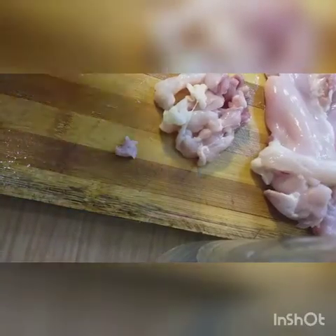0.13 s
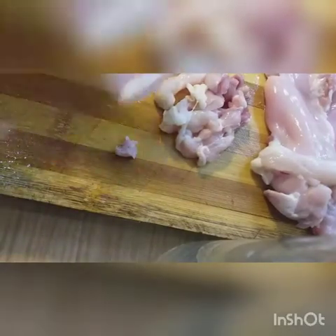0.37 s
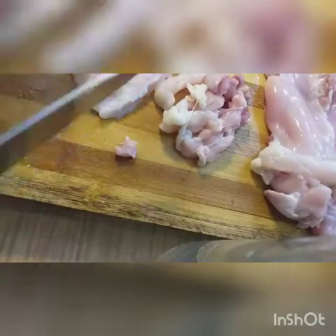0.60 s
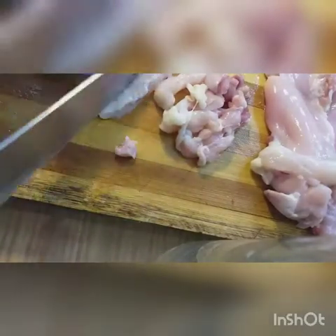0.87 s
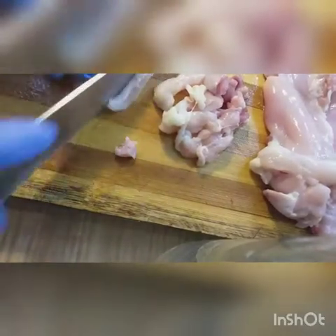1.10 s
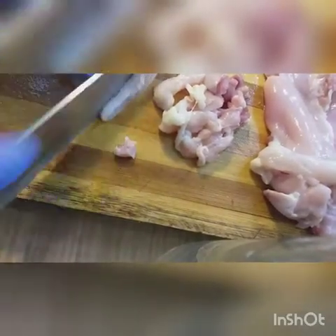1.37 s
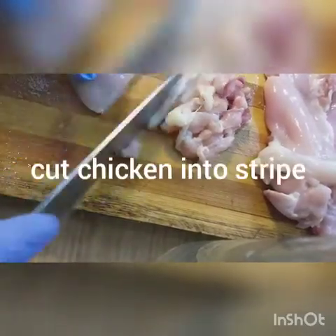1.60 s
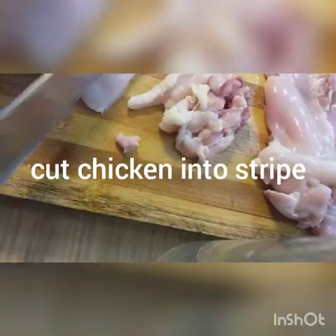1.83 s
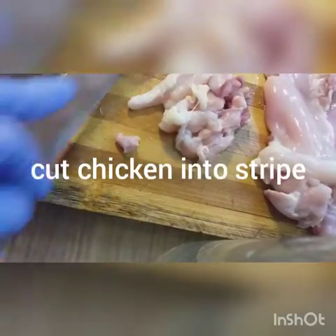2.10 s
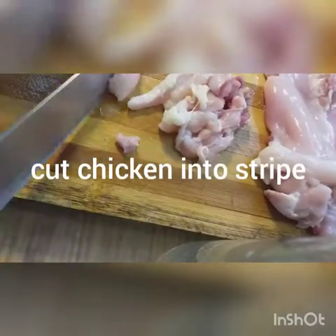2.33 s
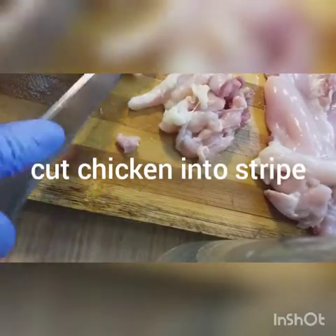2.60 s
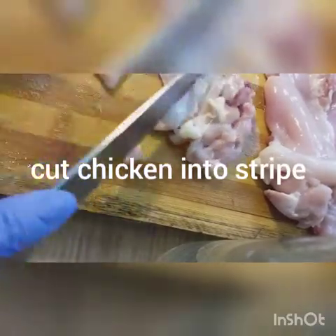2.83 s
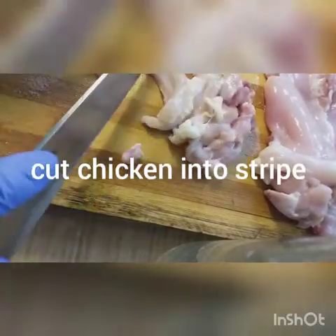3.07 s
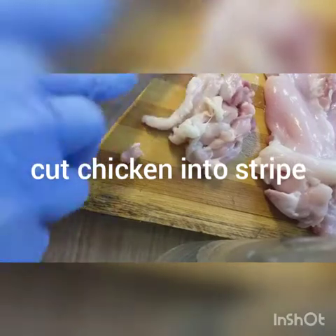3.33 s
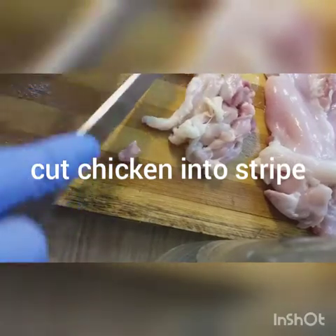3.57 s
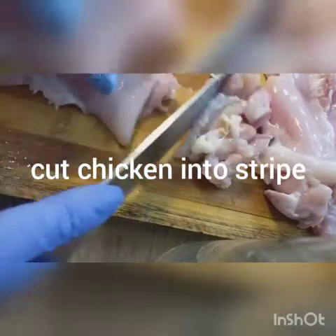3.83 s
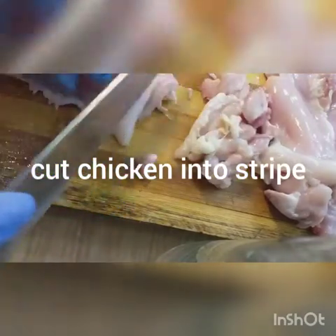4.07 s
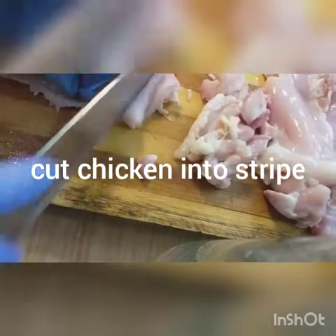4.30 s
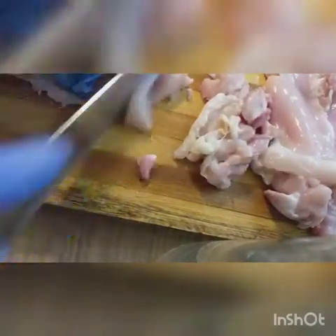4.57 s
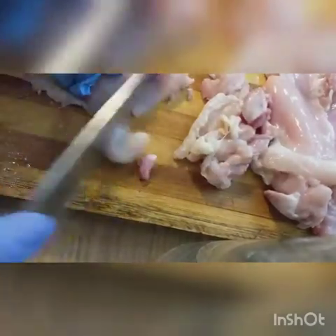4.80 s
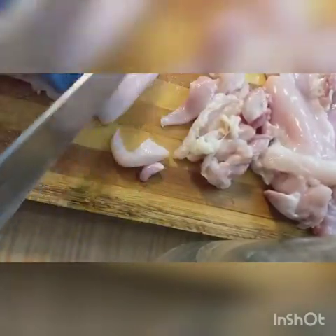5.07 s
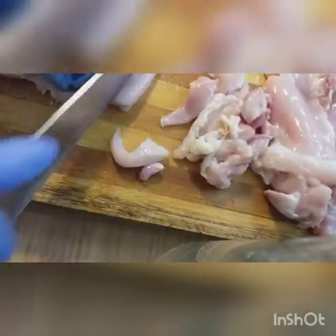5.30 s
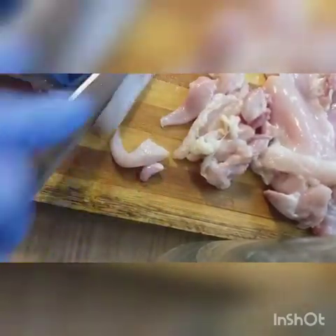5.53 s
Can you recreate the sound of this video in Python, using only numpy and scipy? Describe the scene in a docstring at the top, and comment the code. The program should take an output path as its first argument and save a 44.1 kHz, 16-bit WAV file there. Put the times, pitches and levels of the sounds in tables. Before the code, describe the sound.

A knife cuts raw meat on a wooden board, very close, in a small, fairly dry kitchen. A clear tap with a faint scrape comes at 0.4 s, then near quiet. From 1.05 to 1.65 s three rasping strokes swell, the last two strong. At 2.0 s the board thuds low amid quick knocks, and scrapes run to 2.6 s, the loudest around 2.3; a weaker stroke follows at 2.8. Short scrapes with taps come at 3.2, 3.45 and 3.55 s, then a sharp bladelike click at 3.8. From 4.3 s heavy thuds and knocks lead into a long scrape near 4.6 and a crisp stroke at 4.8. Another thud at 5.27 s begins two last strokes, the stronger near 5.6. Scrapes are gritty, bright steel on wood with airy hiss; small wet ticks and shuffling fill gaps over faint fridge hum, thin whine and hiss.

```python
"""A knife saws strips of raw meat on a wooden board, close to a phone's microphone in a small kitchen.
Strokes, blows, drags and landings drive noise through the resonances of edge, board, blade and counter.
Wet meat ticks in short filtered snaps as it parts; decaying sines thud as the board rocks on the counter.
Behind them lie a fridge's hum and whine, made of resonant noise, the air of the kitchen and a faint hiss."""
import sys
import numpy as np
from scipy import signal
from scipy.fft import rfft, irfft, next_fast_len
from scipy.io import wavfile
from scipy.ndimage import map_coordinates

SR = 44100
rng = np.random.default_rng(int(sys.argv[2]) if len(sys.argv) > 2 else 0)


def materialize(psi):
    """Save the field psi as 16-bit PCM at rate SR to the path in sys.argv[1].

    A 1-D psi becomes a single channel; in a 2-D psi each row is a channel.
    """
    bounded = np.clip(np.atleast_2d(psi).T, -1, 1)
    quanta = np.round(bounded * 32767).astype(np.int16)
    wavfile.write(sys.argv[1], SR, quanta)


def gain_from_db(level_db):
    """Turn a decibel level (scalar or array-like) into a linear amplitude factor."""
    decades = np.asarray(level_db, float) / 20
    return 10 ** decades


N = 250047  # samples

# share of the scrape, of the blade or of the board's low modes [dB]
DULL_DB, KEEN_DB, RING_DB, COUNTER_DB = -4, -5.5, -11.5, -12.5


def unit(x):
    """Scale to rms 1."""
    return x / np.sqrt(np.mean(x ** 2) + 1e-20)


def unit_gain(h):
    """Scale a response so that white noise keeps its power."""
    return h / np.sqrt(np.mean(np.abs(h) ** 2))


def along(points, hz):
    """Interpolate (frequency [Hz], value) points on a log frequency axis."""
    f, v = np.transpose(points)
    return np.interp(np.log(hz + 1), np.log(f + 1), v)


def wobble(rate):
    """A smooth random curve, rate knots a second."""
    knots = rng.standard_normal(int(N * rate / SR) + 4)
    return map_coordinates(knots, [np.arange(N) * rate / SR])


def filtered(x, response):
    """x times a complex response of frequency."""
    m = next_fast_len(N + SR // 2)
    return irfft(rfft(x, m) * response(np.fft.rfftfreq(m, 1 / SR)), m)[:N]


def modes(table):
    """Causal response of resonances with alternating signs, of unit noise gain."""
    def response(f):
        total = 0
        for k, (centre, width, db) in enumerate(table):
            resonance = 1j * f * width / (centre * centre - f * f + 1j * f * width)
            total = total + (-1) ** k * gain_from_db(db) * resonance
        return unit_gain(total)
    return response


def colour(spectrum):
    """Smooth response of unit noise gain."""
    return lambda hz: unit_gain(gain_from_db(along(spectrum, hz)))


def shifting(drive, table):
    """As the contact slides along blade and board, each mode is excited a little more or less."""
    power = np.array([width * gain_from_db(db) ** 2 for _, width, db in table])
    share = np.sqrt(power / power.sum())
    out = np.zeros(N)
    for k, mode in enumerate(table):
        gain = gain_from_db(2.5 * wobble(22))
        out += (-1) ** k * share[k] * filtered(gain * drive, modes([mode]))
    return out


def burst(level_db, t60):
    """A sharp first contact, then a short tail of contact noise."""
    t = np.arange(SR // 8) / SR
    tail = gain_from_db(-60 * t / t60) * (1 - np.exp(-t / 0.00054))
    click = 1.43 * gain_from_db(-60 * t / 0.0037)
    hit = (tail + click) * rng.standard_normal(len(t))
    hit[0] = 3.05
    return gain_from_db(level_db) * hit


def knife():
    """Every contact drives the same bodies: edge, board low and high, blade faces, free blade, counter."""
    # rows: scrape, board, blade faces, upper board, cutting edge, free ring, counter
    drive = np.zeros((7, N + SR))
    drive[:, :N] = sawing()
    add_blows(drive)
    add_swipes(drive)
    add_landings(drive)
    scrape, board, faces, dull, keen, free, shake = drive[:, :N]
    return edge_on_wood(scrape, keen) + board_ring(board, dull) + blade_ring(free, faces), shake


def sawing():
    """Friction noise on each body, under the pressure of the strokes and the shuffling between them."""
    scrape, board, blade = strokes()
    shares = [scrape, board, blade, gain_from_db(DULL_DB) * scrape, gain_from_db(KEEN_DB) * scrape,
              gain_from_db(RING_DB) * blade, gain_from_db(COUNTER_DB) * board]
    shuffle = gain_from_db(shuffle_level() + 0.77 * wobble(15))
    grain = friction(catch_db=1.43, judder_db=0.78)
    drives = []
    for share, db in zip(shares, SHUFFLE_SHARES):
        pressure = np.hypot(share, gain_from_db(db) * shuffle)
        drives.append(grain * gain_from_db(0.95 * wobble(15)) * pressure * rng.standard_normal(N))
    return np.array(drives)


# strokes of the blade: (start [s], fastest [s], end [s], scrape level [dB],
# easing off after the fastest [dB], board share [dB], blade share [dB])
BLADE_STROKES = [(0.376, 0.393, 0.55, -46.5, 14, -4, -5.5), (1.05, 1.15, 1.233, -38.5, 8.5, -0.5, -1.5),
                 (1.244, 1.407, 1.484, -32, 25.5, -4.5, -3.5),
                 (1.483, 1.557, 1.663, -31.5, 35.5, -1.5, -7.5), (2.023, 2.033, 2.2, -48, 4, 2, 0.5),
                 (2.105, 2.117, 2.176, -35.5, 25, -4.5, -5.5), (2.191, 2.313, 2.408, -31, 26, -8, -4.5),
                 (2.408, 2.511, 2.577, -37, 20, -3, -4.5), (2.598, 2.626, 2.73, -54.5, 8.5, -1.5, -1.5),
                 (2.756, 2.845, 2.965, -42.5, 12.5, -14, -2), (3.223, 3.249, 3.37, -34, 12, -4, -3.5),
                 (3.44, 3.452, 3.54, -34, 11, -3, -3), (3.537, 3.554, 3.617, -35.5, 35, -2.5, -3),
                 (3.766, 3.831, 3.89, -42, 10, -8, -0.5), (4.268, 4.33, 4.365, -43.5, 1, 0.5, -1.5),
                 (4.349, 4.355, 4.447, -33.5, 7.5, -6, -4.5), (4.458, 4.585, 4.68, -31, 16.5, -7, -4),
                 (4.699, 4.752, 4.8, -38.5, -9, -4.5, -8), (4.758, 4.779, 4.87, -33.5, 34.5, -6, -3.5),
                 (5.245, 5.316, 5.44, -35.5, 7, -5.5, -5), (5.451, 5.589, 5.674, -30.5, 10, -6.5, -7.5)]
BITE_DB = 4  # the board is pressed this much harder at the start of a stroke than at its end
RISE_POWER, FACE_POWER, STOP_S = 1.28, 0.95, 0.035  # quarter-sine power; faces' power; final halt
# turning back within TURN_S, the edge takes hold with this share of its pressure, in GRIP_S
GRIP, GRIP_S, TURN_S = 0.14, 0.005, 0.03


def strokes():
    """Pressure of every stroke on scrape, board and blade: it swells, eases off and halts."""
    t, out, last_end = np.arange(N) / SR, np.zeros((3, N)), 0
    for start, fastest, end, db, ease_db, board_db, blade_db in BLADE_STROKES:
        rise = np.clip((t - start) / (fastest - start), 0, 1)
        late = np.clip((t - fastest) / (end - fastest), 0, 1)
        grip = GRIP * (start - last_end < TURN_S)
        swell = grip * np.clip((t - start) / GRIP_S, 0, 1)
        swell += (1 - grip) * np.sin(np.pi / 2 * rise) ** RISE_POWER
        halt = np.sqrt(np.clip((end - t) / STOP_S, 0, 1))
        speed = swell * gain_from_db(-ease_db * late) * halt
        bite_db = BITE_DB * (.5 - np.clip((t - start) / (end - start), 0, 1))
        on_board = gain_from_db(board_db + bite_db) * speed
        on_blade = gain_from_db(blade_db) * speed ** FACE_POWER
        out += (gain_from_db(db) * np.array([speed, on_board, on_blade])) ** 2
        last_end = end
    return np.sqrt(out)


# how the shuffling reaches the seven bodies, in the order of the knife's rows: share [dB]
SHUFFLE_SHARES = [-1, -11, -5, -11.5, -6.5, -16.5, -5]
# glove, blade and meat shuffle between the strokes: (time [s], level [dB])
SHUFFLE_LEVELS = [(0, -59.5), (0.13, -72), (0.205, -76), (0.22, -64.5), (0.29, -74), (0.34, -66),
                  (0.54, -66), (0.62, -77), (0.85, -82), (1.02, -67.5), (1.05, -62), (1.66, -58),
                  (1.78, -72.5), (1.85, -66.5), (1.92, -74.5), (2.0, -59), (3.0, -59.5), (3.15, -68.5),
                  (3.21, -54.5), (3.41, -54), (3.62, -62), (3.76, -59.5), (3.9, -57), (3.96, -63.5),
                  (4.1, -70), (4.27, -62), (4.88, -58.5), (5.04, -70), (5.17, -68.5), (5.24, -59),
                  (5.67, -56)]


def shuffle_level():
    """Level of the shuffling at every sample, in dB."""
    time, level = np.transpose(SHUFFLE_LEVELS)
    return np.interp(np.arange(N) / SR, time, level)


def friction(catch_db, judder_db):
    """The edge catches on wood fibres: uneven grains, sudden snags, slower judder, felt by every body."""
    snags = (rng.random(N) < 90 / SR) * .9 * rng.random(N)  # about 90 a second
    snags = signal.fftconvolve(snags, np.exp(-np.arange(800) / SR / 0.0032))[:N]
    roughness_db = catch_db * wobble(700) + judder_db * wobble(35) + 1.18 * wobble(90)
    return unit(gain_from_db(roughness_db) * (1 + snags))


# blade meets board: (time [s], contact level [dB], knock share [dB], blade share [dB], t60 [s])
BOARD_BLOWS = [(0.3825, -22.5, -2.5, -10.5, 0.031), (1.2457, -48, 1, -6, .035),
               (2.0328, -45, 13, -12, 0.023), (2.0727, -40, 2.5, -5, 0.018), (2.0896, -41, -4, -12, 0.027),
               (2.112, -33, -6, -6, .044), (2.2004, -37.5, -1, -12, 0.045), (2.7566, -50, 6, -8, .035),
               (2.7744, -48, 9, -9, .028), (3.2293, -34, -9, -12.5, 0.031),
               (3.4456, -33.5, -13, -15, 0.037), (3.5458, -30.5, -3.5, -9, .047),
               (3.5699, -34.5, -3, -10, 0.021), (3.7815, -26, -0.5, 6, .022),
               (4.3071, -41, 9, -14.5, 0.039), (4.3548, -29, -10, -17, 0.041),
               (4.3894, -41.5, 13.5, -13, 0.027), (4.4648, -39.5, -1, -8, .035),
               (4.7035, -45.5, 1, -12, 0.058), (4.7775, -26.5, 1.5, -16, 0.041),
               (5.2563, -47, -11, 7, 0.027), (5.2614, -47, 15, -9, .029), (5.4538, -41, 2, -20, 0.035)]


def add_blows(drive):
    """One burst of contact noise strikes all the bodies, each by its share."""
    for s, db, knock_db, ring_db, t60 in BOARD_BLOWS:
        hit = burst(db, t60)
        shares_db = [[0], [knock_db], [ring_db], [-6], [-8.5], [ring_db + RING_DB], [knock_db - 10.5]]
        drive[:, round(s * SR):][:, :len(hit)] += gain_from_db(shares_db) * hit


# the blade is dragged sideways: (start [s], length [s], ring level [dB], board level [dB])
SIDEWAYS_DRAGS = [(1.514, 0.063, -29, -28), (3.544, 0.04, -35, -36), (4.764, 0.038, -30.5, -30.5)]


def add_swipes(drive):
    """Noise that swells and fades lets the blade ring freely and drums the board."""
    for s, length, ring_db, drum_db in SIDEWAYS_DRAGS:
        drag = np.hanning(round(length * SR))
        drag = drag * rng.standard_normal(len(drag))
        drive[5, round(s * SR):][:len(drag)] += gain_from_db(ring_db) * drag
        drive[1, round(s * SR):][:len(drag)] += gain_from_db(drum_db) * drag


# the blade lands flat as it begins to slide: (start [s], length [s], board level [dB])
FLAT_LANDINGS = [(2.025, 0.043, -36), (2.76, 0.083, -42.5), (3.231, 0.045, -38), (4.293, 0.075, -38.5),
                 (5.259, 0.044, -34.5)]


def add_landings(drive):
    """A quick press of noise drums the board and shakes the counter."""
    for s, length, drum_db in FLAT_LANDINGS:
        press = np.sin(np.pi * np.linspace(0, 1, round(length * SR)) ** .5)
        press = press * rng.standard_normal(len(press))
        start = round(s * SR)
        drive[[1, 6], start:start + len(press)] += gain_from_db([[drum_db], [drum_db + COUNTER_DB]]) * press


# steel on wood: (centre [Hz], width [Hz], relative level [dB])
EDGE_MODES = [(2915, 66, -7.5), (3526, 80, 3), (3996, 78, 7.5), (4084, 162, 14), (4670, 170, -10.5),
              (4850, 130, -2), (5233, 360, -10), (5600, 120, 2)]
# broad rasp of the scrape: (frequency [Hz], relative density [dB per Hz])
RASP_SPECTRUM = [(2000, -23.5), (2900, -2.5), (4300, 1.5), (5700, 0.5), (6500, -27.5), (8500, -27.5)]
# the thin cutting edge: (centre [Hz], width [Hz], relative level [dB])
KEEN_MODES = [(6120, 102, -1), (6690, 164, -3.5), (6960, 210, -7), (7260, 260, -3), (7750, 260, -4),
              (8225, 360, -6)]


def edge_on_wood(scrape, keen):
    """Steel scraping over grain rings in narrow modes above a broad rasp."""
    ring = gain_from_db(-4.0) * shifting(scrape, EDGE_MODES)
    rasp = gain_from_db(-2.0) * filtered(scrape, colour(RASP_SPECTRUM))
    return ring + rasp + gain_from_db(-0.23) * shifting(keen, KEEN_MODES)


# low modes of the wooden board: (centre [Hz], width [Hz], relative level [dB])
BOARD_MODES = [(408.4, 56.5, -1.5), (470.8, 24.5, 4), (660, 91.5, 4.5), (717, 39.7, 6), (735, 83, 0),
               (925, 41, 5), (937, 92, 3), (1043, 148, -2.5)]
# upper modes of the board: (centre [Hz], width [Hz], relative level [dB])
DULL_MODES = [(1230, 47, -1.5), (1330, 105, -1), (1573, 247, -2), (1890, 64, 0), (2085, 65, -0.5),
              (2247, 162, 1), (2458, 380, -4)]


def board_ring(board, dull):
    """The board answers in low and upper resonances."""
    return gain_from_db(1.38) * shifting(board, BOARD_MODES) + gain_from_db(1.07) * shifting(dull, DULL_MODES)


# the freely ringing blade: (centre [Hz], width [Hz], relative level [dB])
BLADE_MODES = [(9000, 150, -9), (10700, 120, -8), (11600, 80, -4), (12400, 70, -4), (12900, 35, 4),
               (13250, 80, -1), (13700, 80, -1), (14400, 40, 3), (15100, 70, -1)]
# blade faces in the meat: (frequency [Hz], relative density [dB per Hz])
FACE_HISS = [(7500, -18), (8800, -10), (10200, -4), (11500, -2), (13500, 0.5), (15800, -4)]


def blade_ring(free, faces):
    """The blade rings in high modes while its faces hiss in the meat."""
    return filtered(free, modes(BLADE_MODES)) + gain_from_db(-0.5) * filtered(faces, colour(FACE_HISS))


# wet meat parting and small touches: (time [s], level [dB], centre [Hz], width [share of centre])
MEAT_TICKS = [(0.214, -46.5, 6620, .8), (0.498, -42.5, 4480, 0.76), (1.6618, -44.5, 1580, .6),
              (1.663, -49, 5960, 1.4), (1.712, -60, 9000, 0.93), (1.8463, -58, 3700, 0.21),
              (2.074, -31.5, 7500, 0.28), (2.616, -42, 11100, 1), (2.635, -48, 3180, 1),
              (2.674, -42, 6500, 1), (3.6274, -52.5, 3540, 0.77), (3.6391, -45.5, 4800, 0.52),
              (3.691, -55, 5630, 0.54), (3.713, -52, 5600, .7), (3.716, -55, 14500, .3),
              (3.732, -54, 4000, 1), (3.7595, -47, 13900, 0.43), (4.0087, -52, 3800, 0.84),
              (4.184, -53, 5100, 0.19), (4.263, -43, 9600, .73), (4.8735, -44.5, 4470, .78),
              (5.0188, -59.5, 8800, 0.54), (5.14, -45.5, 12300, 1.3), (5.1733, -54, 14800, .5),
              (5.2062, -43, 5500, 0.65), (5.228, -47, 7000, .4)]


def meat():
    """Each tick is a brief snap in a steep-sided resonance; faint ones come at random with the shuffling."""
    out, shuffle_db = np.zeros(N + SR), shuffle_level()
    faint = []
    for u, v, w in rng.random((40, 3)):
        level_db = shuffle_db[int(u * N)] + 2 + 10 * (v - .5)
        faint.append((u * N / SR, level_db, 3000 * 4 ** w, 0.5))
    for s, db, hz, width in MEAT_TICKS + faint:
        snap = burst(db, t60=0.026)
        f = np.fft.rfftfreq(len(snap), 1 / SR)
        steep = unit_gain(modes([(hz, width * hz, 0)])(f) ** 2)
        snap = irfft(rfft(snap) * steep, len(snap))
        out[round(s * SR):][:len(snap)] += snap
    return out[:N]


# the board rocks and thuds on the counter: (time [s], level [dB], pitch [Hz])
ROCKING_THUDS = [(0.399, -44, 68), (0.869, -57, 59), (1.114, -31.5, 74), (1.199, -39, 69), (1.342, -37, 87),
                 (1.53, -36, 85), (1.598, -42.5, 98), (1.847, -38, 70.0), (2.041, -29, 69.5),
                 (2.077, -25, 68), (2.148, -33, 75), (2.3, -37, 116), (2.417, -40, 86), (2.508, -39, 69),
                 (3.259, -43, 55), (3.785, -47, 109), (4.308, -23, 93), (4.339, -27, 74),
                 (4.399, -30, 75.4), (4.539, -40, 105), (4.786, -40, 114), (5.271, -26.5, 91.48),
                 (5.285, -30, 70), (5.391, -36, 74.63), (5.469, -43, 86.7), (5.555, -36, 64.4)]


def thuds():
    """Soft thuds: sines at a low pitch with a rounded onset and a steady decay."""
    out, t = np.zeros(N + SR), np.arange(SR // 2) / SR
    onset = (1 - np.exp(-t / 0.0066)) ** 2
    for s, db, hz in ROCKING_THUDS:
        decay = gain_from_db(db - 60 * t / 0.17)  # t60 0.17 s
        out[round(s * SR):][:len(t)] += decay * onset * np.sin(2 * np.pi * hz * t)
    return out[:N]


# modes of the counter: (centre [Hz], width [Hz], relative level [dB])
COUNTER_MODES = [(144.5, 54, -1), (200.7, 25, 2), (242, 82, -2.5), (281, 47, -5)]
# the board swaying on the counter: (centre [Hz], width [Hz], relative level [dB])
SWAY_MODES = [(70, 22, 2.5), (105, 32.5, -3.5)]


def counter(shake):
    """The knife's pressure and a faint constant tremble shake the counter's modes; the board sways."""
    tremble = gain_from_db(-75 + 1.7 * wobble(40) + 0.83 * wobble(5.6)) * rng.standard_normal(N)
    ring = filtered(shake + tremble, modes(COUNTER_MODES))
    board_push = shake / gain_from_db(COUNTER_DB)
    sway = gain_from_db(-17.5) * filtered(board_push, lambda hz: unit_gain(modes(SWAY_MODES)(hz) ** 2))
    return ring + sway


# answer of the small kitchen: (frequency [Hz], t60 [s])
KITCHEN_DECAY = [(200, 0.27), (2000, 0.16), (10000, 0.15)]


def kitchen(x):
    """Each frequency of the room's answer dies at its own speed."""
    hz, t, z = signal.stft(rng.standard_normal(SR // 2), SR, nperseg=256)
    decay = gain_from_db(-60 * t / along(KITCHEN_DECAY, hz)[:, None])
    tail = signal.istft(z * decay, SR, nperseg=256)[1]
    delayed = np.pad(x, (200, 0))  # samples
    return signal.fftconvolve(delayed, tail / np.linalg.norm(tail))[:N]


# hum of the fridge: (centre [Hz], width [Hz], relative level [dB])
HUM_MODES = [(63, 10, -6), (101.8, 6.2, 1.5), (148.7, 3, 5), (187, 10, -7.5), (219.4, 17, -4.5),
             (299, 30, -20.5)]
# whine of its compressor: (centre [Hz], width [Hz], relative level [dB])
WHINE_MODES = [(1120, 12, -2.5), (1060, 40, -18)]


def fridge():
    """Noise in narrow resonances: a low hum, cut above 330 Hz, and a thin compressor whine."""
    hum = filtered(rng.standard_normal(N), lambda hz: modes(HUM_MODES)(hz) / (1 + (hz / 330) ** 6))
    whine = filtered(rng.standard_normal(N), modes(WHINE_MODES))
    return gain_from_db(-70 + 1.5 * wobble(1.7)) * hum + gain_from_db(-94 + 2.5 * wobble(2.5)) * whine


# air of the kitchen: (frequency [Hz], relative density [dB per Hz])
AIR_SPECTRUM = [(200, -17), (330, -3.5), (500, -19), (900, -10), (1200, -3), (1700, -22), (2700, -16),
                (3900, -3.5), (5100, -5), (7600, -11), (9300, -23), (12000, -15), (15800, -12.5)]


def air():
    """Coloured noise whose level drifts slightly."""
    return gain_from_db(-73.0 + 0.37 * wobble(4.83)) * filtered(rng.standard_normal(N), colour(AIR_SPECTRUM))


# faint hiss unlike on the two sides: (frequency [Hz], relative density [dB per Hz])
SPREAD_SPECTRUM = [(300, -29), (3000, -13.5), (6000, -6.5), (9000, -7), (15800, -3.5)]


def side_hiss():
    """Coloured noise, to be added on one side and subtracted on the other."""
    return gain_from_db(-80 + 2.5 * wobble(3)) * filtered(rng.standard_normal(N), colour(SPREAD_SPECTRUM))


def scene():
    """Almost one channel: only a faint hiss differs from side to side."""
    blade, shake = knife()
    near = blade + meat()
    mid = near + gain_from_db(-12.5) * kitchen(near) + thuds() + counter(shake) + fridge() + air()
    side = side_hiss()
    return np.array([mid + side, mid - side])


def band_limit(x):
    """A steep low-pass at the top of the band."""
    return signal.sosfilt(signal.butter(12, 16490, fs=SR, output="sos"), x)


def record(dry):
    """The phone's microphone, close by, drops the deepest bass and all above its band limit."""
    def microphone(hz):
        bass = 1j * hz / 50
        return (hz < 15880) * bass ** 2 / (1 + 1.4 * bass + bass ** 2)
    mix = np.array([filtered(x, microphone) for x in dry])
    return band_limit(mix)


dry = scene()
out = record(dry)
materialize(out)
```